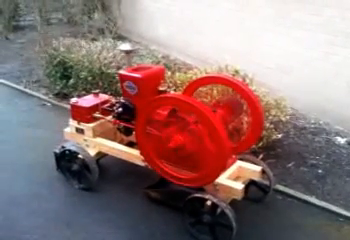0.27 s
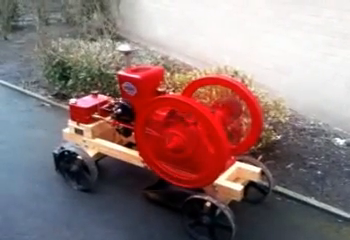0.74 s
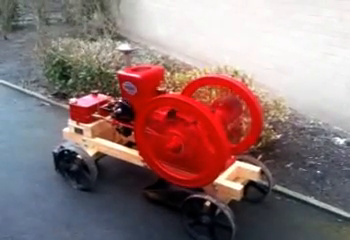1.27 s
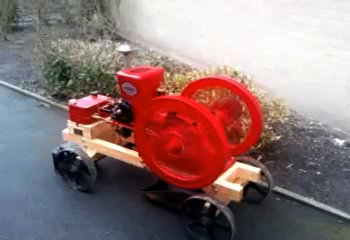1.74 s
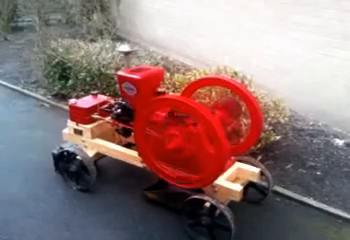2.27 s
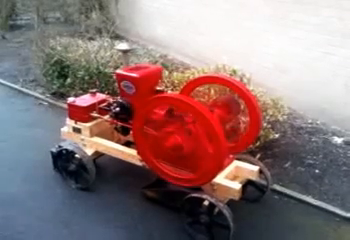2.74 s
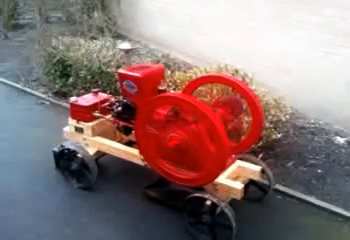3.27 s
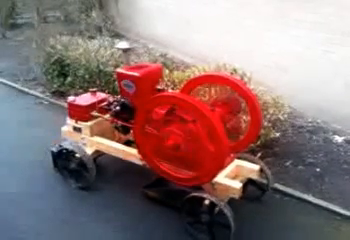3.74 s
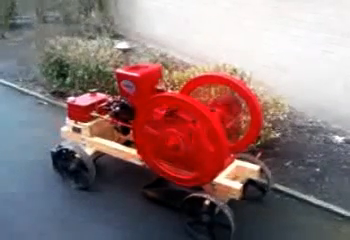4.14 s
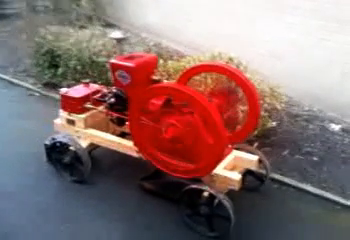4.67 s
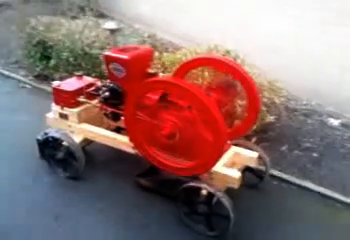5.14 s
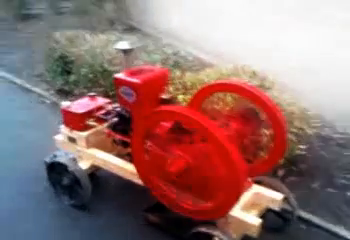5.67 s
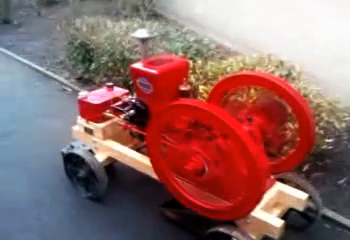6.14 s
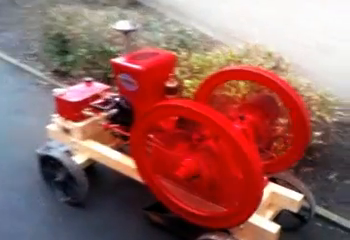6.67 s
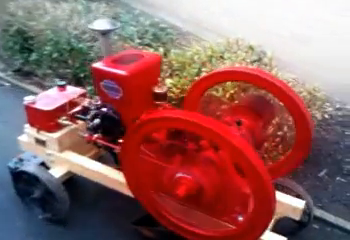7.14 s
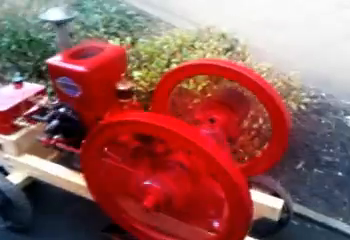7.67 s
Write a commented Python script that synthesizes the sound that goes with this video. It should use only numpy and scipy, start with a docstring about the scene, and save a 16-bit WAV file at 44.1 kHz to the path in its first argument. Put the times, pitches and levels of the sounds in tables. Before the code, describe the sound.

An old open engine coasts with ticking gears, sharp pinging snaps and hollow puffing, broken by sudden loud exhaust bangs about every three seconds.

```python
"""Hit-and-miss engine on a cart, close by

Outdoors, a small microphone stands close to an engine on a wooden cart. It fires about every three
seconds, once twice in a row, and coasts and slows between. Bangs are noise jets and ringing muffler modes.
Each cam cycle has an igniter snap, a rod knock, gear ticks and an exhaust sigh, from modes and shaped noise.
After firings the governor latch clacks; the intake valve snorts, mostly ahead of a bang. The microphone
moves closer near the end, which lifts the clatter, and the loudest bangs overload it."""
import sys
import numpy as np
from scipy import signal
from scipy.fft import rfft, irfft, next_fast_len
from scipy.io import wavfile

SR = 44100
rng = np.random.default_rng(int(sys.argv[2]) if len(sys.argv) > 2 else 0)


def materialize(psi):
    """Save the field psi as 16-bit PCM at rate SR to the path in sys.argv[1].

    A 1-D psi becomes a single channel; in a 2-D psi each row is a channel.
    """
    bounded = np.clip(np.atleast_2d(psi).T, -1, 1)
    quanta = np.round(bounded * 32767).astype(np.int16)
    wavfile.write(sys.argv[1], SR, quanta)


N = 348390
AGE = np.arange(SR // 4) / SR  # seconds since a blow

# exhaust bangs: t/s, level/dB, swell of the valve opening/s, length of the blow-down/s
FIRINGS = [(0.4276, 2.5, 0.0022, 0.015), (0.812, -9.5, 0.0014, 0.009), (3.478, -1.5, 0.0016, 0.018),
           (6.135, 3, 0.0053, 0.02)]
# igniter snaps, one a cam cycle: t/s, level/dB, bracket relative to the snap/dB, lever pitch f/Hz
SNAPS = [(0.2974, -12.5, -14.5, 2556), (0.7083, -12.5, -15, 2550), (1.0958, -13, -17.5, 2560),
         (1.4984, -16, -11, 2570), (1.92, -12.5, -10.5, 2623), (2.368, -11, -24, 2570),
         (2.8409, -15.5, -4, 2600), (3.3494, -14.5, -28, 2637), (3.7575, -13, -14, 2516),
         (4.1605, -16.5, -9, 2480), (4.583, -10, -27.5, 2635), (5.029, -10, -21.5, 2580),
         (5.5011, -15, -7, 2710), (6.0092, -9, -12.5, 2484), (6.4143, -12, -5.5, 2530),
         (6.814, -11.5, -7.5, 2590), (7.235, -12.5, -8.5, 2575), (7.6765, -10, -7.5, 2510)]
# noise spectrum of clanking metal: f/Hz, level/dB per Hz
CLANK_SPECTRUM = [(530, -43.5), (900, -14.5), (1200, -15.5), (1570, -8), (1970, -2), (2510, -1.5),
                  (2600, 6.5), (2950, -17), (3400, -8), (3660, -26), (3970, -26), (5160, -44), (8730, -120)]
# noise spectrum of loose, rattling parts: f/Hz, level/dB per Hz
RATTLE_SPECTRUM = [(60, -19), (200, -18.5), (400, -11), (550, -6.5), (1100, -4), (1900, 1), (2550, 4),
                   (2900, -3), (3350, -6), (3700, -20.5), (4100, -28), (4800, -25.5), (5200, -58)]
# noise spectrum of low puffs and thuds: f/Hz, level/dB per Hz
PUFF_SPECTRUM = [(30, -22), (70, -6.5), (150, -1), (260, 3), (380, -18), (900, -10.5), (2000, -12),
                 (4000, -66.5)]
# noise spectrum of the cart's rumble and the open air: f/Hz, level/dB per Hz
RUMBLE_SPECTRUM = [(20, -36), (45, -7), (80, -5), (150, -0.5), (230, 0.5), (300, 3.5), (410, 1.5),
                   (500, -7), (700, -3), (1500, -11), (4000, -56.5)]
CHARGE_S = 0.27  # how long before a bang the charge is drawn in and squeezed


def exhaust():
    """The valve cracks open, the gas blows down in a rough jet and the muffler rings on."""
    # muffler resonances: f/Hz, level/dB, t60/s
    muffler_modes = [(220, -11.5, 0.15), (667, 1, 0.018), (760, -9.5, 0.085), (952, 0.5, 0.11),
                     (1000, -11, 0.11), (1123, 4, 0.17), (1200, -11.5, 0.29), (1283, 4.5, 0.046),
                     (1373, 2.5, 0.028), (1530, -2.5, 0.13), (1518, -6.5, 0.15), (1575, -3.5, 0.21),
                     (1855, -5.5, 0.01), (1736, -2.5, 0.15), (2343, -5, 0.12), (3060, -3.5, 0.092),
                     (3500, -28, 0.15)]
    # noise spectrum of the jet: f/Hz, level/dB per Hz
    blast_spectrum = [(24, -27.5), (40, -25), (460, -13), (820, -6.5), (1400, -4.5), (1670, 0), (1950, -7),
                      (2230, -8.5), (2500, -5.5), (2920, -9.5), (3470, -17), (3750, -20.5), (3970, -31),
                      (5160, -40.5), (8730, -120)]
    out = np.zeros(N)
    for s, db, swell, length in FIRINGS:
        jet = burst(blast_spectrum, rise=swell, hold=length, t60=.05)
        pot = ring(muffler_modes, rise=swell, hold=.35 * length, detune=0.0013)
        yard = burst(blast_spectrum, rise=0.025, hold=0.045, t60=0.45)
        mix = jet + amp(-5) * pot + amp(-26) * yard
        # soft limiting keeps the bang's peaks even; a low-pass keeps it dark above 3.7 kHz
        bang = np.tanh(.5 * mix)
        bang = filtered(bang, lambda hz: 1 / np.sqrt(1 + (hz / 3700) ** 10))
        clank = burst(CLANK_SPECTRUM, rise=.0005, hold=0.0057, t60=0.026)
        add(out, s - .006, amp(db - 27.5) * clank)
        add(out, s, amp(db) * bang)
    return out


def igniter():
    """The trip lever snaps off its catch with one short ping, then chatters against the lower-pitched bracket."""
    # bracket resonances: f/Hz, level/dB, t60/s
    bracket_modes = [(1586, -7, .03), (1804, -10, .03), (1996, 0.5, 0.044), (2132, -7, 0.03),
                     (2258, -3.5, 0.046), (2500, -4, 0.062)]
    # noise spectrum of the snap: f/Hz, level/dB per Hz
    crack_spectrum = [(100, -29.5), (400, -22.5), (1000, -15), (1600, -11), (2000, -6.5), (2600, 1),
                      (2950, -7.5), (3300, -10), (3700, -28), (4100, -34.5), (4800, -36.5), (5200, -40.5)]
    out = np.zeros(N)
    for s, db, bracket_db, hz in SNAPS:
        lever = fade(rise=0.0011, hold=0.004, t60=0.03) * np.sin(2 * np.pi * hz * AGE)
        crack = burst(crack_spectrum, rise=0.00037, hold=.007, t60=.055)
        bracket = ring(bracket_modes, rise=0.0041, hold=0.0067, detune=0.011)
        chatter = burst(crack_spectrum, rise=0.00043, hold=0.0076, t60=.05)
        add(out, s - .0013, amp(db) * (amp(-2.5) * lever + amp(-11.5) * crack))
        add(out, s + .001, amp(db + bracket_db) * bracket)
        add(out, s + 0.0066, amp(db - 18.5) * chatter)
    return out


def governor():
    """The latch drops in, bounces once and rattles into its seat."""
    # latch contacts: t/s, level/dB
    latch_drops = [(0.7556, -11.5), (1.1444, -9.5), (1.5443, -18.5), (3.8066, -8), (4.206, -21),
                   (6.4636, -4.5), (6.8627, -13.5)]
    # latch resonances: f/Hz, level/dB, t60/s
    latch_modes = [(787, -13.5, 0.064), (1605, -9, .05), (1654, -9, 0.05), (1803, -3, 0.03),
                   (1984, -7.5, 0.048), (2425, -13, .04)]
    out = np.zeros(N)
    for s, db in latch_drops:
        for delay, bounce_db in [(0, -8.5), (.022, -17.5)]:
            clack = ring(latch_modes, rise=0.0025, hold=0.0047, detune=0.0099)
            loose = burst(RATTLE_SPECTRUM, rise=.0005, hold=0.0045, t60=0.11)
            add(out, s + delay - .001, amp(db + bounce_db) * (clack + amp(-9.5) * loose))
        seating = burst(RATTLE_SPECTRUM, rise=.0015, hold=0.0076, t60=0.15)
        add(out, s + .049, amp(db - 21) * seating)
    return out


def push_rod():
    """The rod knocks home and shakes the iron frame; a softer second contact follows and the valve spring sings."""
    # valve spring resonances: f/Hz, level/dB, t60/s
    spring_modes = [(2550, 0.5, 0.15), (2540, 2, 0.17), (3200, -19.5, 0.12)]
    # noise spectrum of the shaken frame: f/Hz, level/dB per Hz
    frame_spectrum = [(40, -26.5), (90, -9), (220, -8.5), (420, -0.5), (520, -3.5), (680, 2.5), (820, 3),
                      (1000, 2), (1300, -0.5), (1900, -15.5), (4000, -56)]
    out = np.zeros(N)
    for s, db in each_cycle(turn=.472, db=-15.5, shift=.015, db_per_pace=15.5):
        if any(0 < s - bang < .1 and strength > -5 for bang, strength, *_ in FIRINGS):
            # cylinder pressure holds the rod back after a full-strength firing
            s, db = s + .015, db + 2
        frame_db = near_db(s) - 28
        clank = burst(CLANK_SPECTRUM, rise=0.0016, hold=0.0063, t60=0.055)
        frame = burst(frame_spectrum, rise=0.00086, hold=0.0076, t60=0.1)
        second = burst(frame_spectrum, rise=0.0018, hold=0.0077, t60=0.055)
        add(out, s - .001, amp(db - 8.5) * clank + amp(frame_db) * frame)
        add(out, s + .047, amp(frame_db - 10) * second)
        # slow noise roughens the ring's level
        roughness = unit(filtered(rng.standard_normal(len(AGE)), lambda hz: 1 / (1 + (hz / 70) ** 2)))
        spring = ring(spring_modes, rise=.007, hold=.025, detune=0.002)
        add(out, s + 0.015, amp(db - 25) * (.6 + 0.76 * roughness) * spring)
    return out


def backlash():
    """Loose gear teeth and bearings take up their play, more softly while compression holds them tight."""
    # ticks in every cam cycle: turn from the snap (0-1), level/dB,
    # shift/turns per unit of pace, growth/dB per unit of pace
    gear_play = [(.076, -29.5, 0, 0), (.215, -28, -.02, -10), (.254, -15, -.015, 4.5), (.578, -25.5, 0, -7),
                 (.699, -24.5, 0, -2), (.778, -21, 0, -7.5), (.815, -28, 0, -6)]
    out = np.zeros(N)
    for contact in gear_play:
        for s, db in each_cycle(*contact):
            level = db + rng.normal(0, 1) - 14 * before_firing(s, CHARGE_S)
            tick = burst(RATTLE_SPECTRUM, rise=0.00021, hold=0.0037, t60=0.0942)
            add(out, s - .001, amp(level - 10.5) * tick)
    return out


def intake():
    """Air hisses in past the intake valve, which flutters in low puffs."""
    # snorts as a charge is drawn in: t/s, length/s, level/dB
    snorts = [(0.143, 0.067, -28), (2.772, 0.021, -34), (3.197, 0.06, -28), (5.856, .07, -25),
              (6.657, 0.034, -33)]
    flutter_hz = 42
    out = np.zeros(N)
    for s, length, db in snorts:
        hiss = burst(RATTLE_SPECTRUM, rise=0.011, hold=length + .025, t60=.08)
        add(out, s - .04, amp(db - 7) * hiss)
        for delay in np.arange(0, length, 1 / flutter_hz):
            puff = burst(PUFF_SPECTRUM, rise=0.0013, hold=0.0068, t60=0.085)
            add(out, s + delay, amp(db - 2 - 36 * delay) * puff)
    return out


def thumps():
    """The wooden cart booms as the engine rocks, and each firing gives a low thud."""
    # cart resonances: f/Hz, level/dB, t60/s
    cart_modes = [(333, 0.5, 0.045), (396.6, 1, 0.11), (418.7, 8, 0.057)]
    # booms in every cam cycle: turn from the snap (0-1), level/dB,
    # shift/turns per unit of pace, growth/dB per unit of pace
    cart_rocks = [(.165, -37, -.17, -16), (.31, -36, 0, 6.5), (.5, -30.5, 0, 14.5), (.58, -30.5, 0, 10),
                  (.92, -39, .16, 46)]
    out = np.zeros(N)
    for rock in cart_rocks:
        for s, db in each_cycle(*rock):
            boom_db = db - near_db(s) - 6.5  # the boom carries evenly, near or far
            boom = ring(cart_modes, rise=0.0048, hold=0.013, detune=0.023, blur=0.16)
            add(out, s, amp(boom_db) * boom)
    for s, *_ in FIRINGS:
        add(out, s, amp(-22.5) * burst(PUFF_SPECTRUM, rise=.002, hold=.009, t60=.08))
    return out


def gear_rattle(t, teeth):
    """Many small tooth impacts rattle and ping in step with the cam, louder when the engine runs faster."""
    # rattle over one cam cycle: turn from the snap (0-1), level/dB
    gear_load = [(.05, -42.5), (.12, -39.5), (.29, -38), (.42, -45.5), (.51, -31), (.56, -41), (.68, -39.5),
                 (.81, -35), (.89, -37), (.97, -43)]
    rattle_db = np.interp(cam_turn(t), *np.transpose(gear_load), period=1) + 5.5 * pace(t) + near_db(t)
    # compression before a firing loads the gears and hushes their rattle
    rattle_db = rattle_db - 4 * before_firing(t, CHARGE_S)
    noise = coloured(teeth * rng.standard_normal(N), RATTLE_SPECTRUM)
    rattle = amp(rattle_db - 2) * (noise + amp(-4.5) * pings())
    # gentle contacts are duller than hard ones
    dull = filtered(rattle, lambda hz: 1 / (1 + (hz / 3000) ** 10))
    brightness = amp(2.1 * np.minimum(rattle_db + 41, 0))
    return dull + brightness * (rattle - dull)


def pings():
    """Single gear teeth ring out briefly at random moments, each at its own pitch; rms 1."""
    pings_per_s = 60
    out = np.zeros(N)
    for when, colour, size in rng.random((int(pings_per_s * N / SR), 3)):
        hz = 700 + 2800 * colour
        tone = fade(rise=.0005, hold=.002, t60=0.061) * np.sin(2 * np.pi * hz * AGE)
        add(out, when * N / SR, amp(14 * size) * tone)
    return coloured(out, RATTLE_SPECTRUM)


def exhaust_sigh(t):
    """The piston pumps air through the open valve: rushing noise and the cylinder's gliding hollow tone."""
    # air flow over one cam cycle: turn from the snap (0-1), level/dB
    air_flow = [(.05, -59), (.12, -40.5), (.26, -49), (.31, -38.5), (.36, -40), (.44, -34), (.52, -43.5),
                (.6, -43), (.76, -50.5), (.83, -41.5), (.96, -45.5)]
    # noise spectrum of the rush: f/Hz, level/dB per Hz
    air_spectrum = [(200, -23.5), (500, -8), (700, -5), (850, -2), (1100, -3.5), (1500, -9.5),
                    (2500, -22.5), (4000, -54)]
    turn = cam_turn(t)
    air_db = np.interp(turn, *np.transpose(air_flow), period=1) + 7.5 * pace(t) + near_db(t)
    # the sigh sinks while the exhaust valve is shut
    air_db = air_db - 3.9 * before_firing(t, CHARGE_S)
    rush = coloured(rng.standard_normal(N), air_spectrum)
    sigh = hollow(turn, centre_hz=1063, swing_hz=339.6, width_hz=290, lowest_turn=.355)
    return amp(air_db) * (amp(-2.5) * rush + amp(-6) * sigh)


def hollow(turn, centre_hz, swing_hz, width_hz, lowest_turn):
    """The cylinder's air resonance sinks as the piston draws out and rises as it returns, twice a cam cycle."""
    pitch = centre_hz - swing_hz * np.cos(4 * np.pi * (turn - lowest_turn))
    phase = 2 * np.pi * np.cumsum(pitch) / SR
    # two slow noises on a carrier make a noise band around the pitch
    slow = lambda: filtered(rng.standard_normal(N), lambda hz: 1 / (1 + (2 * hz / width_hz) ** 2))
    return unit(slow() * np.cos(phase) + slow() * np.sin(phase))


def cart_shudder(t, teeth):
    """The engine's shaking makes the cart rumble, swelling at fixed points of the turn."""
    # swells in every cam cycle: turn from the snap (0-1), half-width/turns, level/dB
    shudders = [(.16, .03, -48.5), (.317, 0.033, -40), (0.499, .03, -41), (.595, 0.029, -37.5),
                (0.842, .04, -47.5), (.97, 0.017, -44)]
    turn = cam_turn(t)
    shudder = amp(-55)  # floor between the swells
    for at, width, db in shudders:
        distance = (turn - at + .5) % 1 - .5
        shudder = shudder + amp(db) * np.exp(-(distance / width) ** 2)
    return shudder * coloured(np.sqrt(teeth) * rng.standard_normal(N), RUMBLE_SPECTRUM)


def outdoors():
    """A faint steady rumble of the open air, as shaped noise."""
    return amp(-61.5) * coloured(rng.standard_normal(N), RUMBLE_SPECTRUM)


def casting(hz):
    """The gain of the iron casting's resonances, which colour the clatter."""
    # resonances: f/Hz, width/Hz, level/dB
    casting_modes = [(225, 7.6, -1), (635, 75, 4), (843, 120, 2.5), (1047, 77, 2), (1200, 50, 2.5),
                     (1575, 39, 3.5), (1880, 37, 5.5), (1980, 45, 3), (2300, 37, 0.5), (2477, 13, 3.5),
                     (3240, 310, 2.5)]
    db = sum(peak / (1 + (2 * (hz - centre) / width) ** 2) for centre, width, peak in casting_modes)
    return amp(db - 1)


def shaking(rate, spread_db, t60, steady):
    """The envelope, at rms 1, of small impacts at uneven intervals, each dying quickly."""
    times = np.cumsum(rng.uniform(.3, 1.7, 3000)) / rate
    sizes = amp(spread_db * np.clip(rng.standard_normal(len(times)), -2, 2))
    energy = np.bincount((times * SR).astype(int), sizes ** 2, N)[:N]
    decay = fade(rise=0.00079, hold=0.0069, t60=t60) ** 2
    energy = np.abs(signal.fftconvolve(energy, decay)[:N])
    return unit(np.sqrt(energy / energy.mean() + steady))


def cam_marks():
    """The times at which the cam cycles begin: the snaps, with one cycle added at either end."""
    snaps = np.array(SNAPS)[:, 0]
    return np.concatenate([[snaps[0] - .52], snaps, [snaps[-1] + .455]])


def cam_turn(t):
    """Turns of the cam completed by time t; each whole number is a snap."""
    marks = cam_marks()
    return np.interp(t, marks, np.arange(len(marks)))


def pace(s):
    """Cam cycles a second above the usual 2.25: a firing raises it, coasting lowers it."""
    marks = cam_marks()
    return np.interp(s, (marks[1:] + marks[:-1]) / 2, 1 / np.diff(marks)) - 2.25


def near_db(s):
    """The gain of the clatter as the microphone moves closer."""
    # distance from the engine, as gain: t/s, level/dB
    nearness = [(0, 0), (5.4, 0.5), (6.3, 3.5), (7.9, 4)]
    return np.interp(s, *np.transpose(nearness))


def before_firing(s, length):
    """A soft-edged window, 1 at its middle, over the length seconds before each full-strength bang."""
    return sum(np.exp(-(2 * (s - bang) / length + 1) ** 8) for bang, db, *_ in FIRINGS if db > -5)


def each_cycle(turn, db, shift, db_per_pace):
    """The (s, dB) of a contact in every cam cycle; its place and strength follow the speed."""
    marks = cam_marks()
    speed = pace(marks[:-1] + turn * np.diff(marks))
    times = marks[:-1] + (turn + shift * speed) * np.diff(marks)
    levels = db + db_per_pace * speed + near_db(times)
    return [(s, level) for s, level in zip(times, levels) if 0 < s < N / SR - .02]


def amp(db):
    """Decibels to gain."""
    return 10 ** (np.asarray(db) / 20)


def unit(x):
    """Scaled to rms 1."""
    return x / np.sqrt(np.mean(x ** 2) + 1e-20)


def filtered(x, response):
    """x times a response of frequency."""
    m = next_fast_len(len(x) + SR // 8)
    return irfft(rfft(x, m) * response(np.fft.rfftfreq(m, 1 / SR)), m)[:len(x)]


def coloured(x, spectrum):
    """x shaped by (Hz, dB) points on a log axis, at rms 1."""
    f, db = np.transpose(spectrum)
    return unit(filtered(x, lambda hz: amp(np.interp(np.log(hz + 1), np.log(f), db))))


def fade(rise, hold, t60):
    """A blow swells, holds and dies; all in seconds."""
    return (1 - np.exp(-AGE / rise)) * amp(-60 * np.maximum(AGE - hold, 0) / t60)


def burst(spectrum, rise, hold, t60):
    """Many crowded modes sounding at once: a fading noise of steady energy."""
    shape = fade(rise, hold, t60)
    noise = coloured(rng.standard_normal(len(AGE)), spectrum)
    return unit(noise * shape) * np.sqrt(np.mean(shape ** 2))


def ring(modes, rise, hold, detune, blur=1, scatter_db=2):
    """Damped modes, new in strength each time; blur 0 starts them in step, as a clean blow, 1 jumbles them."""
    shapes, tones = [], []
    for hz, db, t60 in modes:
        strength, tuning, phase = rng.standard_normal(3)
        shapes.append(amp(db + scatter_db * strength) * fade(rise, hold, t60))
        tones.append(np.sin(2 * np.pi * (hz * (1 + detune * tuning) * AGE + blur * phase)))
    power = np.sum(np.square(shapes), axis=0)
    mix = np.sum(np.multiply(shapes, tones), axis=0)
    return unit(mix) * np.sqrt(power.mean() / power.max())


def add(track, s, sound):
    """Mix a sound into the track at s seconds."""
    start = min(max(round(s * SR), 0), N)
    track[start:start + len(sound)] += sound[:N - start]


def scene():
    """All parts of the engine, heard from one side; the casting colours the clatter and the background."""
    t = np.arange(N) / SR
    teeth = shaking(rate=70, spread_db=3.5, t60=0.034, steady=0.31)
    running = gear_rattle(t, teeth) + exhaust_sigh(t) + cart_shudder(t, teeth) + outdoors()
    clatter = filtered(push_rod() + backlash() + running, casting)
    return (exhaust() + igniter() + governor() + intake() + thumps() + clatter)[None]


def record(dry):
    """A narrow-band microphone without deep bass; the loudest peaks clip at full scale."""
    bass_hz, mic_top_hz, top_hz = 48.4, 5000, 15600
    thin = filtered(dry[0], lambda hz: hz ** 2 / np.sqrt(hz ** 4 + bass_hz ** 4))
    narrow = filtered(thin, lambda hz: 1 / np.sqrt(1 + (hz / mic_top_hz) ** 80))
    clipped = np.clip(narrow, -1, 1)
    return filtered(clipped, lambda hz: hz < top_hz)[None]


dry = scene()
out = record(dry)
materialize(out)
```